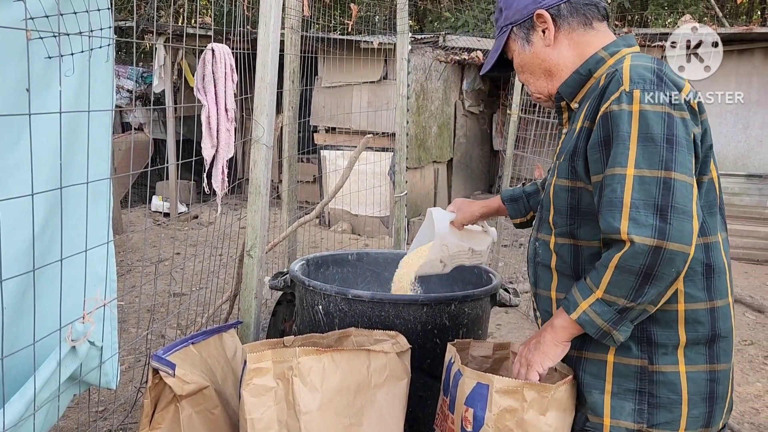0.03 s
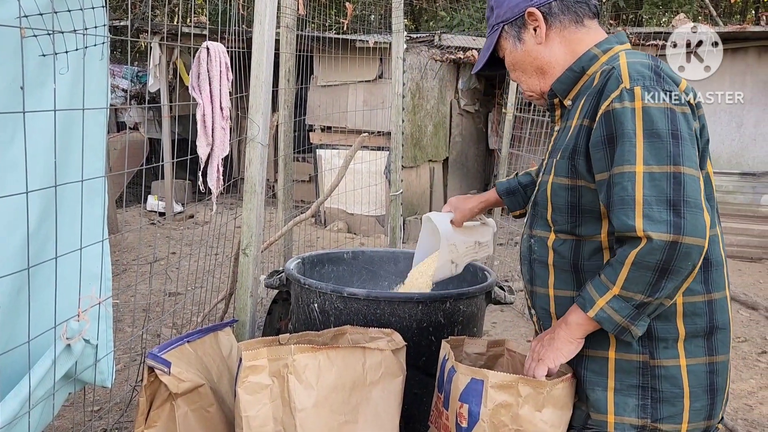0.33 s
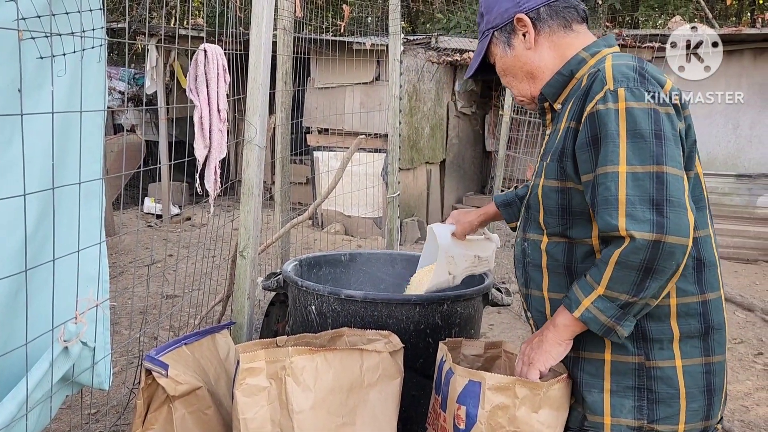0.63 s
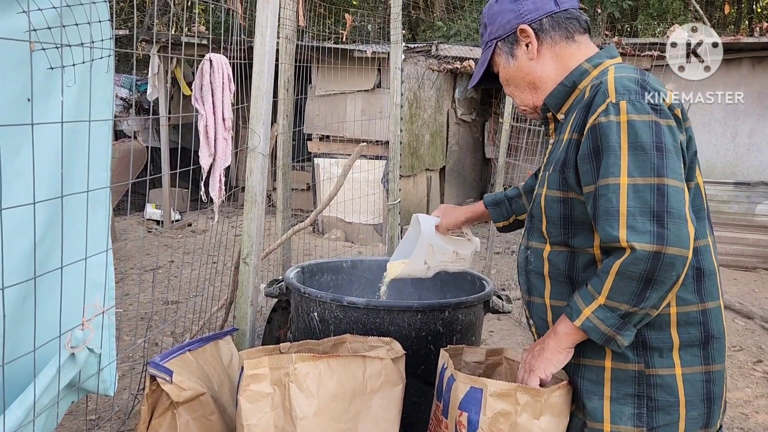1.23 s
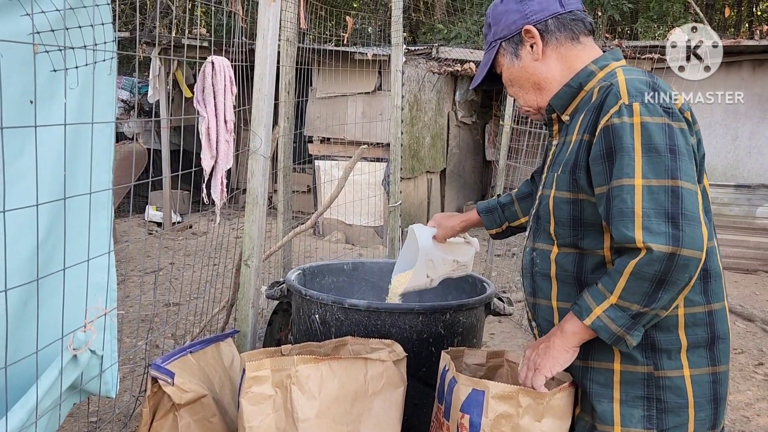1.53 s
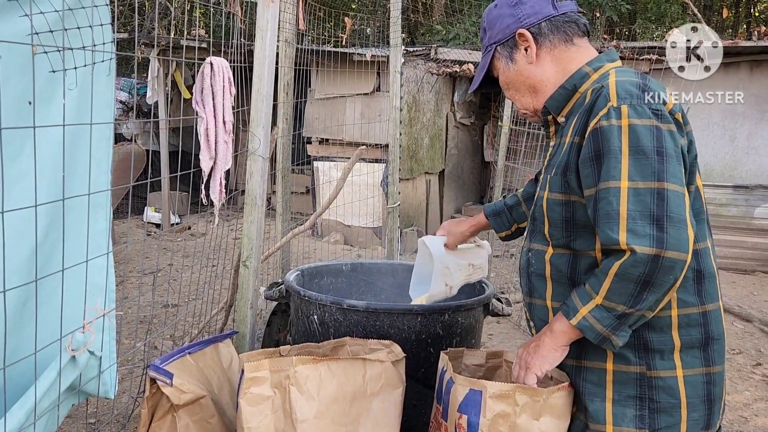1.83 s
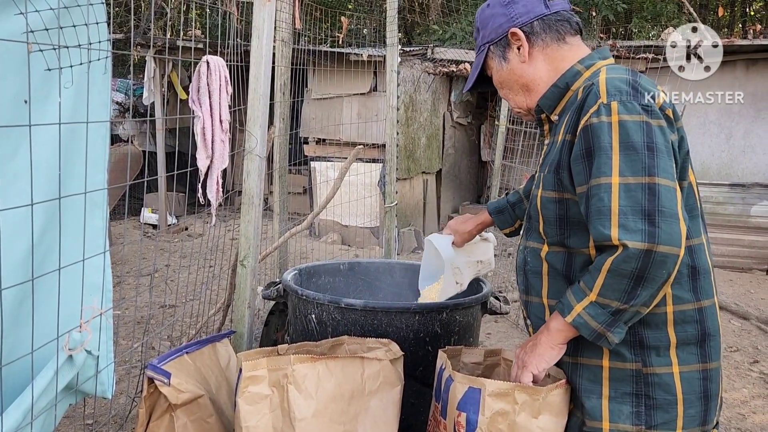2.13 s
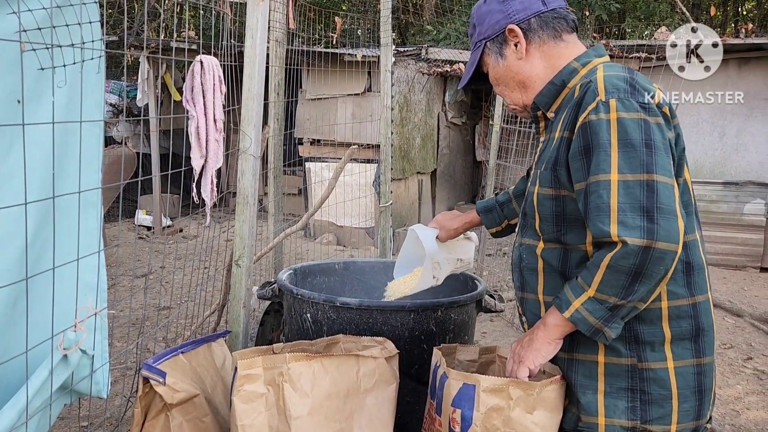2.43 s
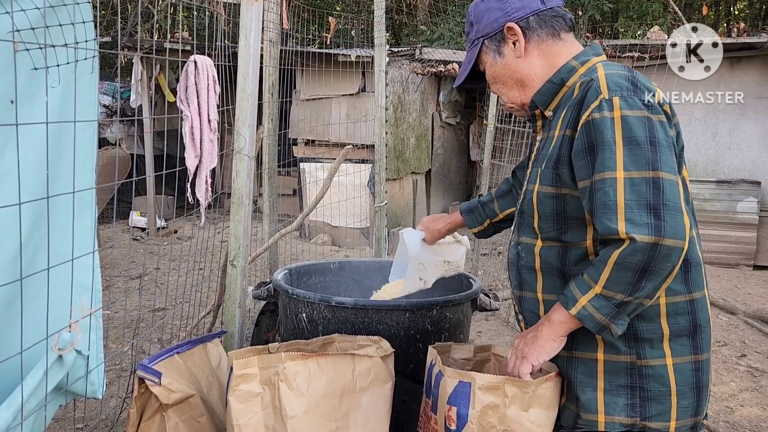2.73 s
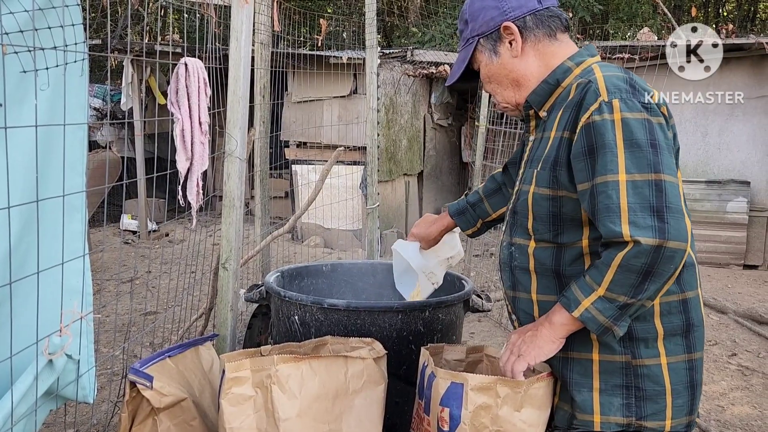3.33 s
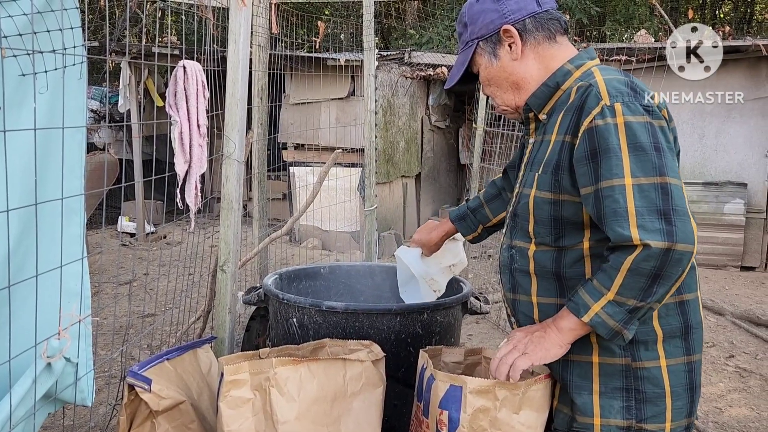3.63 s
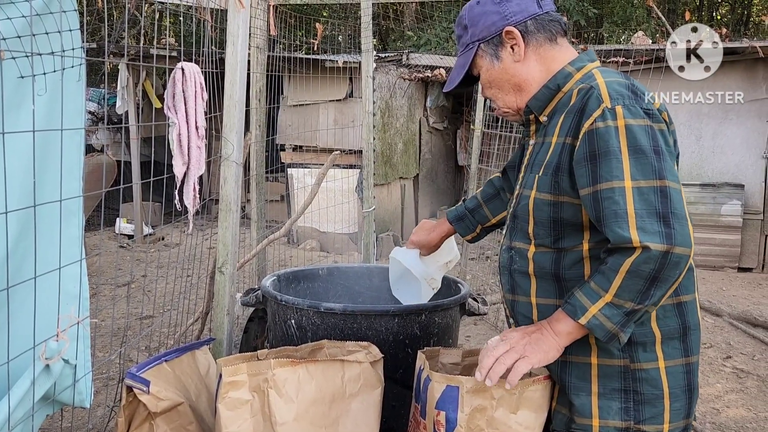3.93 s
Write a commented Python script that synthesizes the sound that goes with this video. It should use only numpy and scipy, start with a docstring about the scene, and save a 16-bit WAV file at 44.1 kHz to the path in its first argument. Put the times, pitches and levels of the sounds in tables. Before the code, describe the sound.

Dry meal shaken from a plastic scoop patters into a tub, first in rustling clumps, then in lighter spurts with small snaps. Close, dull knocks come at the start and near the end, over low outdoor rumble and faint hiss.

```python
"""A dull knock, close by; then clumps of dry meal land in a large plastic tub, rustling and popping.
The meal is shaken from a plastic scoop in a quiet yard: each shake lets a surge of tiny grains slide
out and patter down. Snaps, scuffs, a clack of the scoop and deep handling bumps dot the pour, and a
second knock comes near the end. Under it all lie low outdoor rumble and thin mic hiss."""
import sys
import numpy as np
from scipy import signal
from scipy.fft import rfft, irfft
from scipy.io import wavfile

SR = 44100
rng = np.random.default_rng(int(sys.argv[2]) if len(sys.argv) > 2 else 0)


def wav_record(signal):
    """Record a signal, one row per channel, as 16-bit PCM in the file named by sys.argv[1]."""
    frames = np.transpose(np.atleast_2d(signal))
    bounded = np.clip(frames, -1, 1)
    # unit amplitude maps onto the largest positive 16-bit level
    quanta = np.round(bounded * 32767).astype(np.int16)
    wavfile.write(sys.argv[1], SR, quanta)


N = 176400
T = np.arange(N) / SR
HZ = np.maximum(np.arange(N // 2 + 1) * SR / N, 1)

# surges of meal, one per shake: (peak time [s], rise [s], fall [s], level [dB])
MEAL_SURGES = [(.27, 0.26, .15, -43.5), (.575, 0.16, 0.089, -46), (.83, .035, 0.068, -54.5),
               (.96, 0.099, .1, -48.5), (1.39, 0.093, .125, -46.5), (1.815, 0.093, 0.057, -44.5),
               (2.08, .075, 0.035, -46), (2.245, .075, .085, -50), (2.545, 0.096, .06, -46),
               (2.78, 0.092, .19, -50), (3.03, .15, 0.27, -51.5), (3.33, 0.23, .34, -45),
               (3.412, 0.057, 0.037, -41), (3.79, 0.11, 0.12, -51.5), (4.0, 0.09, .08, -46)]
# tone of grains hitting the tub: (frequency [Hz], gain [dB])
MEAL_EQ = [(100, -50), (270, -15), (480, -16), (620, -6.5), (740, -1.5), (950, -5), (1150, -11.5),
           (1360, 0.5), (1560, -1), (2000, 1), (3100, -1), (4200, -1), (5200, -2.5), (6600, -7),
           (8000, -5.5), (11000, -10.5), (16000, -49)]
# stereo image of the patter: (frequency [Hz], left-right correlation [-1..1])
MEAL_CORRELATION = [(700, 1), (1400, 0.76), (2500, 1), (4500, 0.23), (9000, 0.17)]
# where the patter sits: (frequency [Hz], left minus right [dB])
MEAL_PAN = [(300, 8), (700, 2), (1400, -5.5), (3000, -4), (6500, -0.5)]
# hollow pops: clumps landing, with a lower clack of the scoop in the second-last row: # (time [s], level [dB],
# pitch [Hz])
HOLLOW_POPS = [(.076, -33.5, 586), (.1455, -35, 670), (.152, -40.5, 570), (.201, -37, 610),
               (.238, -37, 1030), (.242, -35, 700), (.266, -33, 626), (.276, -32.5, 620),
               (.294, -36.5, 704), (.586, -39.5, 920), (.597, -37.5, 627), (.607, -39.5, 645),
               (.808, -47, 840), (1.02, -47.5, 954), (2.084, -43.5, 406), (2.862, -49.5, 336)]
# clusters of meal clumps landing in the tub: (peak time [s], rise [s], fall [s], level [dB])
CLUMP_CLUSTERS = [(.115, 0.058, 0.044, -48), (.15, 0.02, .06, -40), (.215, 0.04, .081, -40),
                  (.275, .025, .04, -45), (.36, 0.069, 0.11, -49.5), (.595, 0.052, 0.078, -46),
                  (.812, 0.026, 0.044, -49.5), (1.03, 0.036, 0.16, -57.5), (2.085, 0.033, 0.014, -46.5)]
# dull, hollow tone of their rustle: (frequency [Hz], gain [dB])
RUSTLE_EQ = [(60, -3), (180, -5.5), (420, -3.5), (540, -4), (655, 2), (790, -4), (890, -7), (1020, -1.5),
             (1180, -8.5), (1450, -1), (1800, -8), (2400, -4), (3400, -42)]
# stereo image of the rustle: (frequency [Hz], left-right correlation [-1..1])
RUSTLE_CORRELATION = [(280, 0.97), (640, 0.38), (1400, -0.66), (3000, 0.8)]
# dry snaps, some from hard grains: (time [s], level [dB], pitch [Hz])
SNAP_HITS = [(0.145, -36, 7800), (0.145, -35, 2390), (1.611, -41.5, 1770), (2.083, -29, 1880),
             (3.14, -40, 2620)]
# dull knocks: (time [s], level [dB], tilt [dB/octave], rebound delay [s], rebound gain [dB],
# thump pitch [Hz], thump level [dB])
KNOCK_HITS = [(.026, -32, 2.5, 0.0057, -29, 117, -32.5), (3.7128, -28, -2.5, 0.00733, -14, 72, -33.5)]
# resonances of the knocked body: (frequency [Hz], gain [dB], t60 [s])
KNOCK_RESONANCES = [(266, -5, 0.056), (390, -17, 0.036), (701, -5.5, 0.034), (950, -2, 0.0073),
                    (1393, 0.5, 0.025), (1846, -6.5, 0.025), (2420, -12, 0.021)]
# short rubs: (peak time [s], rise [s], fall [s], level [dB])
SCUFF_RUBS = [(.031, 0.0064, 0.028, -42), (3.716, 0.00663, 0.017, -36.5), (3.77, 0.032, 0.055, -55.5),
              (1.3, 0.044, 0.072, -55.5), (.72, 0.059, 0.044, -53), (2.1, 0.012, 0.035, -57)]
# dull tone of the rubbing: (frequency [Hz], gain [dB])
SCUFF_EQ = [(60, -34), (130, -2.5), (280, 1.5), (400, 3), (560, -11), (900, -3.5), (1500, -9), (2500, -12),
            (5000, -40)]
# deep handling bumps: (time [s], level [dB])
HANDLING_BUMPS = [(0.731, -45), (0.984, -46.5), (1.044, -46), (1.545, -43.5), (1.735, -44.5),
                  (2.705, -46.5), (2.855, -45.5)]
# distant rumble and air: (frequency [Hz], gain [dB])
RUMBLE_EQ = [(15, -45), (28, -6), (42, -4), (58, 1.5), (80, -6.5), (120, -7), (165, -18.5), (300, -20.5),
             (1000, -25.5), (3000, -30.5), (8000, -78)]
# image of rumble and scuffs, wider toward the top: (frequency [Hz], left-right correlation [-1..1])
CENTRED_BASS = [(100, 0.98), (300, 0.92), (1000, 0.15)]
# thin microphone hiss: (frequency [Hz], gain [dB])
HISS_EQ = [(1000, -26), (4000, -42), (6000, -41), (6900, -25), (7400, -12.5), (11000, -7.5), (13800, -1),
           (14600, 5.3), (15600, 0)]
# the hiss leans left: (frequency [Hz], left minus right [dB])
HISS_PAN = [(10000, 1.4), (14500, 3)]
# bounces off tub wall, ground and sheds: (delay [s], gain [dB], left minus right [dB])
YARD_REFLECTIONS = [(.0031, -31.5, 22), (.0058, -21.5, -17.5), (.0125, -12.5, 10)]


def meal(trickle_db=-60, flutter_db=.7):
    """Grains slide off the scoop and patter into the tub in surges, with a trickle between shakes."""
    flow = np.hypot(swells(MEAL_SURGES), from_db(trickle_db))
    flow *= from_db(flutter_db * drift(rate_hz=30))
    impacts = grains(flow, per_s=9000, ref_db=-47.5, spread_db=-.5)
    patter = colour(impacts, MEAL_EQ, MEAL_CORRELATION, MEAL_PAN, left_lead_s=.000075)
    return shimmer(patter, depth_db=2.5, rate_hz=20)


def pops():
    """Landing clumps and a lower clack of the scoop each sound one hollow pitch."""
    return sum(thud(s, db, hz, rise_s=.0021) for s, db, hz in HOLLOW_POPS)


def clump_rustle():
    """Clusters of meal clumps land in the tub with a dull, hollow rustle."""
    landings = grains(swells(CLUMP_CLUSTERS), per_s=1500, ref_db=-41, spread_db=.5)
    return colour(landings, RUSTLE_EQ, RUSTLE_CORRELATION)


def snaps():
    """Lone dry snaps, each a short crackle around its own pitch."""
    return sum(burst(clicks([s], db), hz, t60=.016, octaves=.26) for s, db, hz in SNAP_HITS)


def knocks(contact_s=.0003):
    """A soft blow gives a low thump; the blow and its rebound ring a few well damped modes."""
    times, db, tilt_db, delay, rebound_db, thump_hz, thump_db = np.transpose(KNOCK_HITS)
    body = sum(ring(clicks([s], level), hz, t60=.09) for s, level, hz in zip(times, thump_db, thump_hz))
    for k, (hz, mode_db, t60) in enumerate(KNOCK_RESONANCES):
        strike_db = db + mode_db + tilt_db * np.log2(hz / 500)
        blows = clicks(times, strike_db) + clicks(times + delay, strike_db + rebound_db)
        body -= (-1) ** k * ring(blows, hz, t60)   # modes alternate in polarity
    contact = np.exp(-.5 * (np.arange(-60, 61) / (SR * contact_s / 6)) ** 2)   # rounds off the attack
    return np.convolve(body, contact / contact.sum(), "same")


def scuffs():
    """Tiny slips blur into brief, dull rubbing around the knocks and between shakes."""
    slips = grains(swells(SCUFF_RUBS), per_s=3000, ref_db=-46.5, spread_db=.5)
    return colour(slips, SCUFF_EQ, CENTRED_BASS)


def bumps():
    """Soft, deep handling bumps poke out of the rumble."""
    return sum(thud(s, db, hz=62.6, rise_s=.012) for s, db in HANDLING_BUMPS)


def rumble(level_db=-55.5, waver_db=2):
    """A wavering bed of distant outdoor rumble and air."""
    bed = colour(rng.standard_normal((2, N)), RUMBLE_EQ, CENTRED_BASS)
    return bed * from_db(level_db + waver_db * drift(rate_hz=22))


def hiss(level_db=-39):
    """The microphone's own noise, thin and steady."""
    return from_db(level_db) * colour(rng.standard_normal((2, N)), HISS_EQ, balance=HISS_PAN)


def yard(x, cutoff_hz=3800):
    """Direct sound plus a few dull early reflections."""
    hz = np.arange(N + 1) * SR / (2 * N)
    echoes = sum(from_db(db) * pan(side_db) * np.exp(-2j * np.pi * hz * delay)
                 for delay, db, side_db in YARD_REFLECTIONS)
    dulled = echoes / (1 + 1j * hz / cutoff_hz)
    return irfft(rfft(x, 2 * N) * (1 + dulled))[:, :N]


def swells(rows, shape=1.8):
    """Envelope of overlapping swells, summed in power; shape curves their flanks."""
    power = 0
    for peak_s, rise, fall, db in rows:
        distance = np.abs(T - peak_s) / np.where(T < peak_s, rise, fall)
        power += (from_db(db) * np.exp(-distance ** shape)) ** 2
    return np.sqrt(power + 1e-14)


def grains(level, per_s, ref_db, spread_db):
    """Two click streams at this rms level: per_s clicks a second at ref_db, more and harder above."""
    chance = np.clip(per_s / SR * level / from_db(ref_db), 1e-3, 1)
    sizes = rms_one(from_db(spread_db * np.minimum(rng.exponential(1, (2, N)), 4)))
    polarity = rng.choice([-1, 1], (2, N))
    hits = rng.random((2, N)) < chance
    return hits * sizes * polarity * level / np.sqrt(chance)


def clicks(times, db):
    """Single clicks at given times and levels."""
    track = np.zeros(N)
    track[(np.asarray(times) * SR).astype(int)] = from_db(db)
    return track


def thud(start_s, db, hz, rise_s):
    """A soft impact: one resonance swells to this level and dies away."""
    age = np.maximum(T - start_s, 0)
    envelope = age / rise_s * np.exp(1 - age / rise_s)
    return from_db(db) * envelope * np.sin(2 * np.pi * hz * age)


def ring(x, hz, t60):
    """Each click sets a damped sine ringing."""
    decay, step = from_db(-60 / (t60 * SR)), 2 * np.pi * hz / SR
    return signal.lfilter([0, np.sin(step)], [1, -2 * decay * np.cos(step), decay ** 2], x + 1e-18)


def burst(x, hz, t60, octaves):
    """Each click triggers a dying puff of noise in one band."""
    edges = np.clip(hz * 2 ** (np.array([-.5, .5]) * octaves), 20, .45 * SR)
    bandpass = signal.butter(2, edges, "band", fs=SR, output="sos")
    noise = signal.sosfilt(bandpass, rng.standard_normal((2, N)))
    envelope = signal.lfilter([1], [1, -from_db(-60 / (t60 * SR))], x + 1e-18)
    return rms_one(noise) * envelope


def colour(pair, eq, correlation=None, balance=None, left_lead_s=0):
    """Shape two white signals with a power-neutral EQ, then set their stereo width and position."""
    mid, side = rfft(pair) * rms_one(from_db(curve(eq)))
    alike = np.clip(curve(correlation), -.995, .995) if correlation else 0
    stereo = np.sqrt((1 + alike) / 2) * mid + np.sqrt((1 - alike) / 2) * side * np.array([[1], [-1]])
    stereo[1] *= np.exp(-2j * np.pi * HZ * left_lead_s)
    return irfft(stereo * pan(curve(balance) if balance else 0), N)


def shimmer(x, depth_db, rate_hz):
    """Each half octave wavers in level on its own."""
    spectrum = rfft(x)
    octave = np.clip(np.log2(HZ / 250), 0, 5.5)
    mix = 0
    for centre in np.arange(0, 6, .5):
        band = irfft(spectrum * np.maximum(1 - 2 * np.abs(octave - centre), 0), N)
        mix += band * from_db(depth_db * drift(rate_hz))
    return mix


def drift(rate_hz):
    """Smooth random modulation of rms 1."""
    return rms_one(irfft(rfft(rng.standard_normal(N)) / (1 + (HZ / rate_hz) ** 2), N))


def curve(points):
    """Join breakpoints along a log frequency axis."""
    hz, value = np.transpose(points)
    return np.interp(np.log(HZ), np.log(hz), value)


def pan(db):
    """Left and right gains for a level difference."""
    return from_db(np.array([[.5], [-.5]]) * db)


def from_db(db):
    """Decibels to gain."""
    return 10 ** (np.asarray(db) / 20)


def rms_one(x):
    """Scale to rms 1."""
    return x / np.sqrt(np.mean(x ** 2) + 1e-20)


def scene():
    """The pour gets the yard's reflections; knocks, scuffs, deep bumps and the noise bed stay dry."""
    pour = yard(meal() + pops() + clump_rustle() + snaps())
    return pour + knocks() + scuffs() + bumps() + rumble() + hiss()


def record(dry):
    """A steep low-pass trims the very top."""
    lowpass = signal.ellip(14, .1, 75, 15650, fs=SR, output="sos")
    return signal.sosfilt(lowpass, dry)


dry = scene()
out = record(dry)
wav_record(out)
```